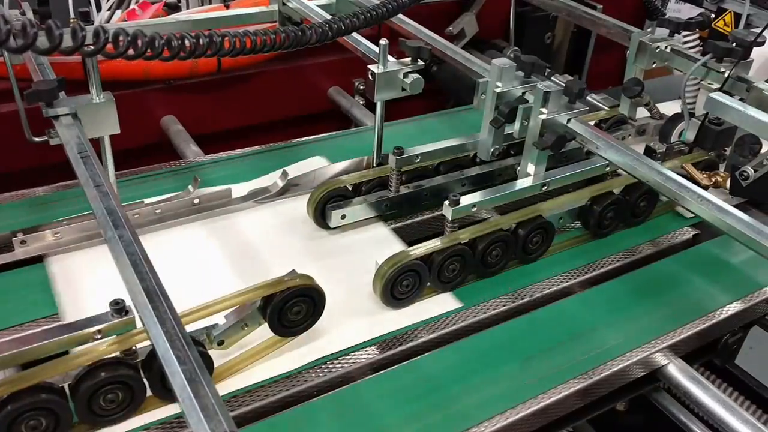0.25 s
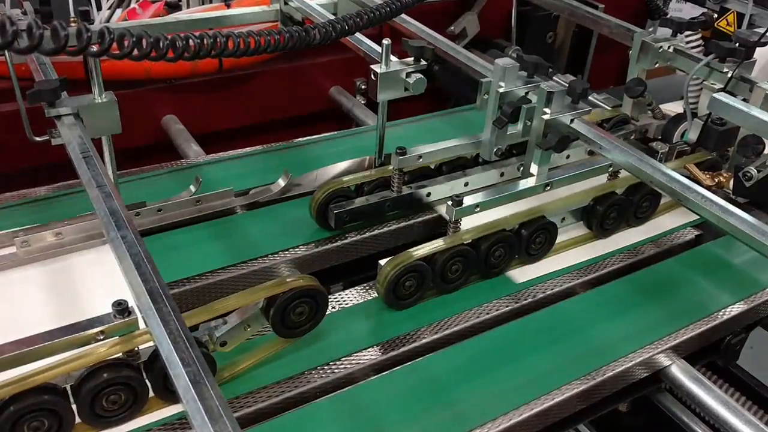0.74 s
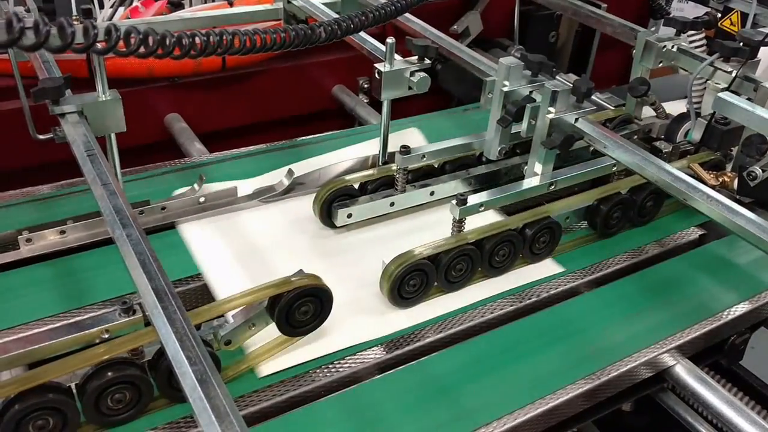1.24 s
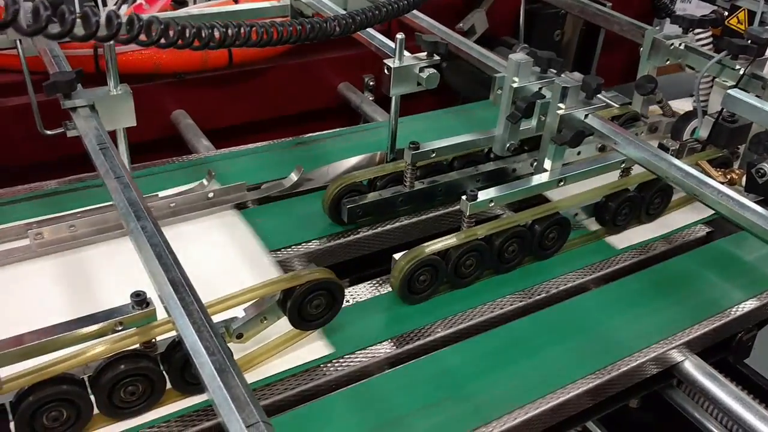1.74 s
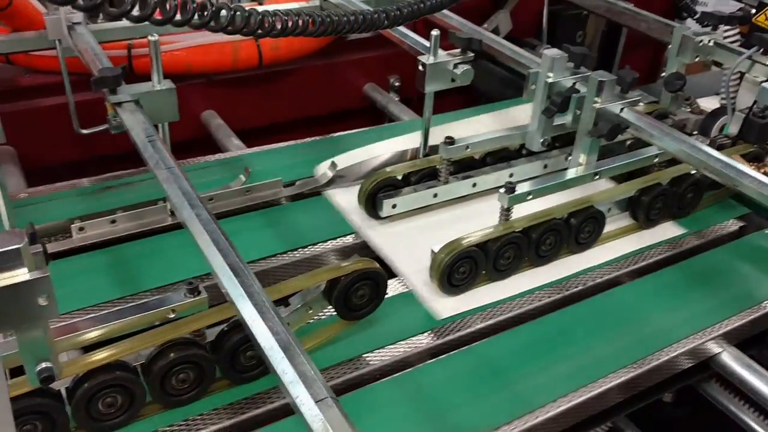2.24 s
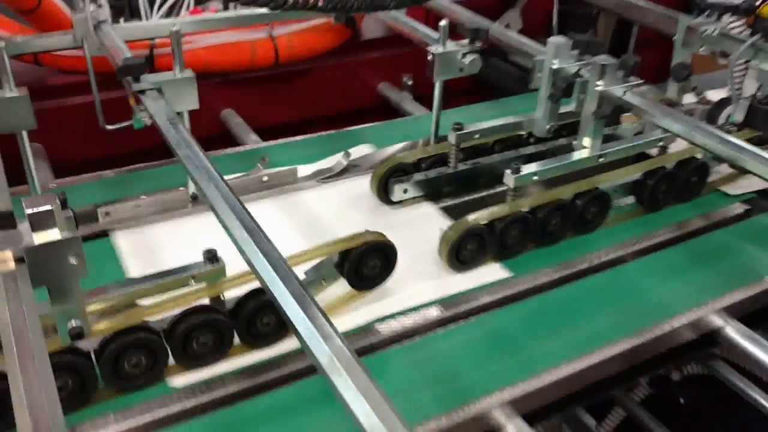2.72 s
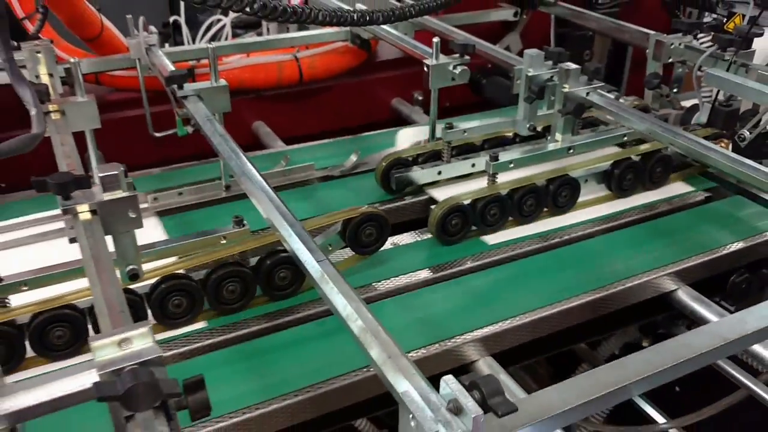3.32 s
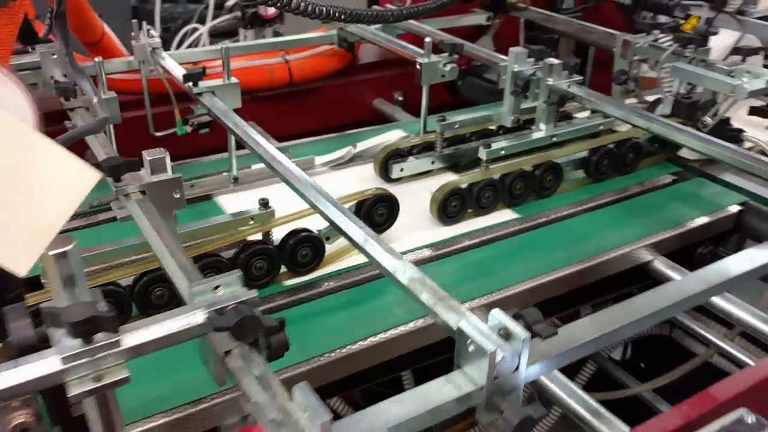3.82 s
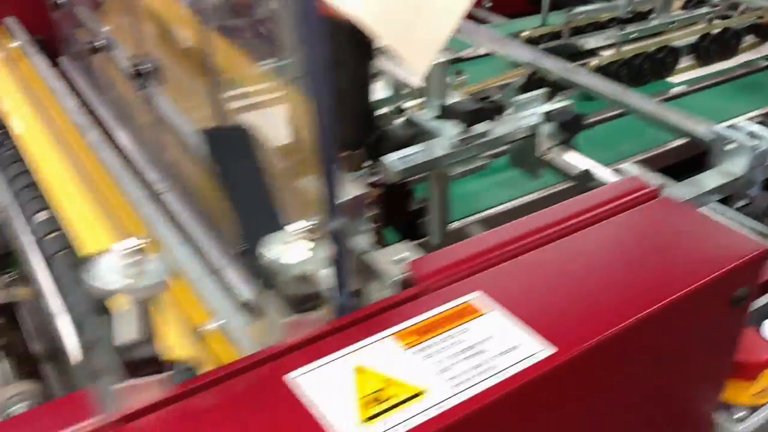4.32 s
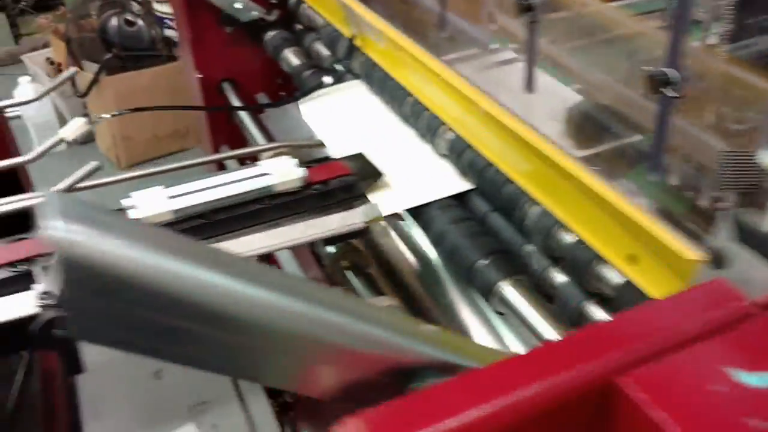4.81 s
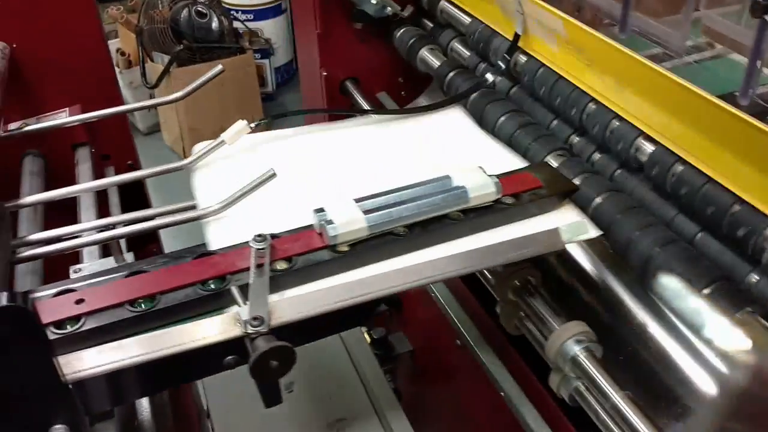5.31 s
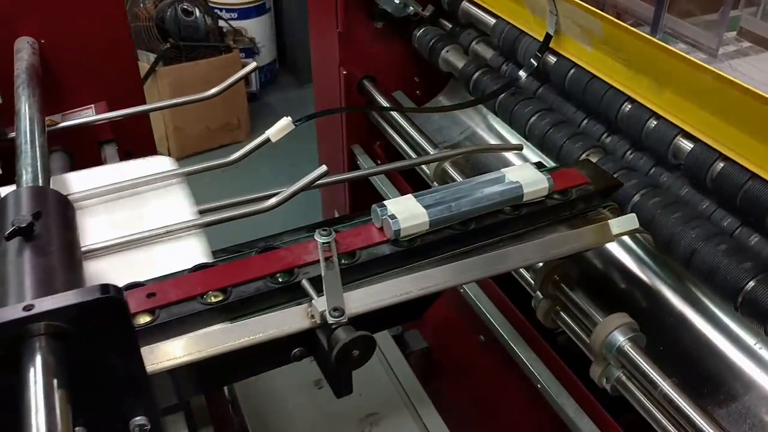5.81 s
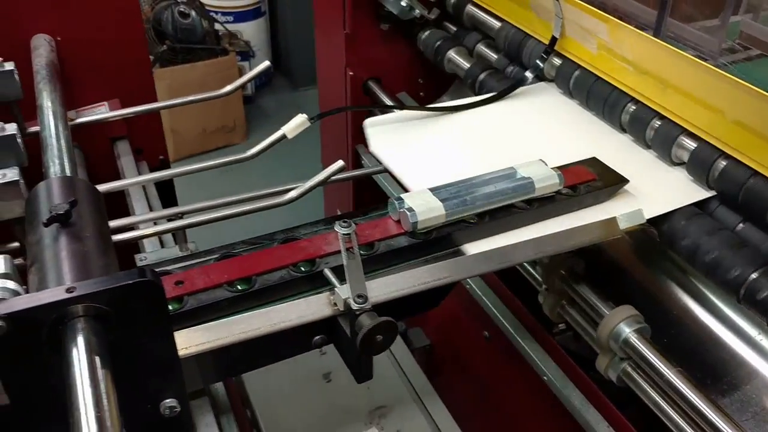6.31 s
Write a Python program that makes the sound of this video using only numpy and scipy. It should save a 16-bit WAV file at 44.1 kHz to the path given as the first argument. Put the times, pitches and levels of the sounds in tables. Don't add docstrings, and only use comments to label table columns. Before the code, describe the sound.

Close handheld stereo pickup of an envelope machine: dense airy hiss, belt whirr and faint steady tones, with sheets passing about every 1.2 seconds. A short burst of blowing air with a soft low hoot hits the microphone. Moving along the line, the hiss fades behind a machine cover, then rollers rumble and rush while a pump chatters very fast, its knocks and rattle leaning to one side.

```python
import sys
import numpy as np
from scipy import signal
from scipy.fft import irfft
from scipy.io import wavfile
from scipy.ndimage import uniform_filter1d

SR = 44100
rng = np.random.default_rng(int(sys.argv[2]) if len(sys.argv) > 2 else 0)


def put_to_file(sound):
    columns = np.atleast_2d(sound).T
    safe = np.clip(columns, -1, 1)
    whole_steps = np.round(safe * 32767)
    wavfile.write(sys.argv[1], SR, whole_steps.astype(np.int16))


def makeup_ratio(level_db):
    decades = np.asarray(level_db, float) / 20
    return 10 ** decades


N = 288851


def read(points, hz):
    f, value = np.transpose(points)
    return np.interp(np.log(hz + 1), np.log(f + 1), value)


def evened(x):
    return x / np.sqrt(np.mean(x ** 2) + 1e-20)


def curves(rows, at):
    first, *columns = np.transpose(rows)
    return np.array([np.interp(at, first, c) for c in columns])


def drift(size):
    return evened(uniform_filter1d(uniform_filter1d(rng.standard_normal(N), size), size))


# time_s, place_m along the line, turned_away 0-1, beam_grip 0-1 on the sound ahead
CAMERA_WALK = [(0, 0, .02, 0.9), (.5, 0.2, 0, .99), (.85, 0, 0, 0.84), (1.2, -0.2, 0, 0.92),
               (1.8, 0.03, 0, 0.8), (2.3, 0.03, .1, .92), (2.7, 0.14, 0.04, .99), (2.95, 0.37, .22, 0.7),
               (3.3, .7, 0.36, .8), (3.65, 1.23, 0.6, 0.9), (3.9, 1.26, .85, 0.9), (4.25, 1.68, 0.75, 0.7),
               (4.6, 2, 1, .86), (4.95, 2.5, 0.7, 0.67), (5.2, 3, 0.8, 0.8), (5.5, 3.0, 1, 0.7),
               (6.0, 3, 1, 0.8), (6.55, 3, 1, 0.75)]


def walk(t):
    return curves(CAMERA_WALK, t)


def heard_db(t, place_m, aside_m):
    return -10 * np.log10(1 + ((walk(t)[0] - place_m) / aside_m) ** 2)


SHADOW_M, SHADOW_WIDE_M = 2.09, 0.58


def shadow(t, on_m=0):
    return np.exp(-((walk(t)[0] - SHADOW_M - on_m) / SHADOW_WIDE_M) ** 2)


SHEET_S, SHEET_EVERY_S, SHEET_LONG_S = 0.15, 1.19, 0.43


def sheet(t):
    turns = ((t - SHEET_S) / SHEET_EVERY_S + .5) % 1 - .5
    return np.cos(np.pi * np.clip(turns * SHEET_EVERY_S / SHEET_LONG_S, -.5, .5)) ** 2


BLAST_S, BLAST_RISE_S, BLAST_HOLD_S = 2.52, .12, .17


def blast(t, fall_s):
    end_s = BLAST_S + BLAST_RISE_S + BLAST_HOLD_S + fall_s
    return np.clip(np.minimum((t - BLAST_S) / BLAST_RISE_S, (end_s - t) / fall_s), 0, 1)


# place_m, aside_m, near_db, hall_db, sheet_gain_db
NOISE_STATIONS = [
    (-0.31, 0.43, -20.5, -40.5, 0),
    (0.49, 0.73, -24, -30, 0),
    (3, 0.56, -27.5, -34, 1.5),
    (0.18, 0.28, -22.5, -49, 2),
]
BLAST_FALL_S, BLAST_DB, STARVE_DB, STIR_DB = .05, -14, 3, 2.5
SHADOW_DB, SHADOW_TOP_DB, SHADOW_TOP_M = 3.5, 2.5, .36


def station_levels(t):
    level = []
    for place_m, aside_m, near_db, hall_db, sheet_db in NOISE_STATIONS:
        direct = makeup_ratio(near_db + heard_db(t, place_m, aside_m))
        level.append(np.hypot(direct, makeup_ratio(hall_db)) * makeup_ratio(sheet_db * sheet(t)))
    level = np.array(level)
    gust_of_air = blast(t, BLAST_FALL_S)
    level[0] *= makeup_ratio(-STARVE_DB * gust_of_air)
    level[3] = np.hypot(level[3], makeup_ratio(BLAST_DB) * gust_of_air ** 2)
    level[2] *= makeup_ratio(STIR_DB * blast(t + 0.075, BLAST_FALL_S))
    level[[0, 1, 3]] *= makeup_ratio(-SHADOW_TOP_DB * shadow(t, SHADOW_TOP_M) ** 4)
    return level * makeup_ratio(-SHADOW_DB * shadow(t))


PUMP_HZ = 12.478
TURN_AHEAD_DB, TURN_AWAY_DB = 1.9, 4.5
# frequency_hz, density_db per Hz
SUCTION_SPECTRUM = [(300, -33), (900, -17), (1600, -17), (2400, -12), (3400, -24), (4800, -3.5),
                    (6500, 1.7), (8500, -0.5), (11500, -1), (13000, -10.5), (14700, -6.5)]
BELT_SPECTRUM = [(60, -43), (110, -9), (200, -7.5), (520, -16), (900, -9.5), (1600, -2.5), (2400, -3.5),
                 (3400, 1), (4800, -2), (6500, -4.5), (8500, -5), (11500, -4), (13000, -6), (14700, -18)]
ROLLER_SPECTRUM = [(30, -36), (60, -34), (110, -11), (200, -5), (340, -4.5), (520, -5.5), (900, -5.5),
                   (1600, -5.5), (2400, -4.5), (3400, -5.5), (4800, -9.5), (8500, -15), (11500, -17),
                   (14700, -36)]
JET_SPECTRUM = [(60, -36), (200, -23), (520, -18), (1600, -9.5), (2400, -25), (3400, -3), (4800, -22),
                (6500, -4), (8500, -1.5), (11500, -1.2), (13000, -0.5), (14700, -2.5)]
# frequency_hz, width_hz, gain_db
HOLLOW_RINGS = [(1143, 71, 4.5), (1760, 98, -0.5), (3700, 130, 1.5), (4074, 103, 4), (6270, 140, 0.5),
                (7140, 240, 1.5), (9350, 350, 1.5), (11100, 620, 0.5), (14200, 500, 4.5)]
# frequency_hz, likeness -1 to 1
PORT_LIKENESS = [(50, 0.2), (120, 0.8), (250, 0.87), (800, 0.46), (1500, 0.1), (3000, 0.071), (8000, 0.023),
                 (10500, 0.36), (13000, .45), (15000, .1)]


def air_and_belts(patchy_db=0.84, streaks_db=1.76, flutter_db=0.26, trim_db=-3, turn_gain=2.13,
                  turn_db=-4.5, throb_db=0.5, ahead=0.12):
    frames, hz = N // 256 + 5, np.fft.rfftfreq(1024, 1 / SR)
    a, b, c, d, patches, streaks = rng.standard_normal((frames, 513, 6)).T
    t = np.arange(frames) * 256 / SR
    levels = station_levels(t)
    turn = TURN_AHEAD_DB + (TURN_AWAY_DB - TURN_AHEAD_DB) * walk(t)[1]
    levels[2] *= makeup_ratio(throb_db * np.cos(2 * np.pi * (PUMP_HZ * t - .3)))
    spectra = (SUCTION_SPECTRUM, BELT_SPECTRUM, ROLLER_SPECTRUM, JET_SPECTRUM)
    power = 0
    for spectrum, level in zip(spectra, levels):
        shape = makeup_ratio(read(spectrum, hz)) ** 2
        power = power + np.outer(shape / np.sum(shape), level ** 2)

    rings_db = sum(db / (1 + (2 * (hz - f) / w) ** 2) for f, w, db in HOLLOW_RINGS)
    patches = evened(uniform_filter1d(uniform_filter1d(patches, size=12, axis=0), size=16, axis=1))
    streaks = evened(uniform_filter1d(uniform_filter1d(streaks, size=2, axis=0), size=60, axis=1))
    flutter = evened(uniform_filter1d(rng.standard_normal(frames), size=8))
    flutter = flutter * np.clip(hz / 9000, 0, 1)[:, None]
    field_db = rings_db[:, None] + patchy_db * patches + streaks_db * streaks + flutter_db * flutter

    near = np.outer(np.clip((hz - 8500) / 1500, 0, 1), np.clip(1 - turn / 4, 0, 1))
    same = np.clip(read(PORT_LIKENESS, hz)[:, None] + ahead * near, -1, .95)
    first = a + 1j * b
    ports = np.array([first, same * first + np.sqrt(1 - same ** 2) * (c + 1j * d)])
    shade_db = (turn_gain * turn + turn_db) * np.clip(hz / 6000, 0, 1)[:, None]
    ports *= np.sqrt(power) * makeup_ratio(field_db + trim_db) * makeup_ratio([shade_db / 2, -shade_db / 2])
    return signal.istft(ports, nperseg=1024, noverlap=768)[1][:, :N]


DRIVE_TONES = [339.6, 761.1, 849, 1018.4]
# place_m, aside_m, near_db, sheet_loss_db
DRIVE_PLACES = [(-.1, .55, -44.5, 6), (0, .5, -58, 6), (.55, .8, -48.5, 3.5), (.95, .33, -46.5, 8)]
GUARD_M, GUARD_EDGE_M, GUARD_DB = 2.05, 0.18, 10


def drive(waver_db=2.0, waver_turns=0.031):
    t = np.arange(N) / SR
    screened_db = GUARD_DB / (1 + np.exp((GUARD_M - walk(t)[0]) / GUARD_EDGE_M))
    out = np.zeros((2, N))
    for hz, (place_m, aside_m, db, sheet_db) in zip(DRIVE_TONES, DRIVE_PLACES):
        start = rng.random()
        near_db = db + heard_db(t, place_m, aside_m) - sheet_db * sheet(t) - screened_db
        for port in out:
            turns = hz * t + start + waver_turns * drift(size=5000)
            level_db = near_db + waver_db * drift(size=5000)
            port += np.sqrt(2) * makeup_ratio(level_db) * np.sin(2 * np.pi * turns)
    return out


def dying(turns, fade_db):
    u = turns % 1
    return makeup_ratio(fade_db * (0.2776 - u + np.maximum(u - .95, 0) * 20))


# shaft_order, level_db
CASING_ORDERS = [(11, -53.8), (12, -54.0), (15, -51.2), (19, -49.1), (20, -56.7), (21, -55.6), (23, -45.7),
                 (24, -57.7), (25, -52.7), (26, -49.5), (27, -48.6), (28, -48.2), (29, -55.9), (30, -55.9),
                 (32, -57.5), (36, -57.3), (38, -53.2), (47, -56.5), (50, -57.3), (54, -59.8), (55, -58.5),
                 (57, -55.3), (58, -51.7), (59, -58.8), (60, -54.4), (62, -59.5), (64, -54.3), (67, -60.5),
                 (76, -58.3), (94, -60.9)]
PUMP_M, PUMP_ASIDE_M, PUMP_DB, PUMP_HALL_DB, PUMP_SIDE_DB = 3.32, 0.37, 2, -11, 5
RATTLE_PER_DB = .35
KNOCK_FADE_DB, RATTLE_FADE_DB = 8, 3


def pump(knock_at=0.0904, floor_db=-67, waver_db=0.6):
    t, k = np.arange(N) / SR, np.arange(129)
    order, db = np.transpose(CASING_ORDERS)
    gain_db = np.full(129, floor_db * 1.)
    gain_db[np.round(order).astype(int)] = db
    phase = -signal.hilbert(np.log(makeup_ratio(np.r_[gain_db, gain_db[-2:0:-1]]))).imag[:129]
    phase += 3 * (k / 50) ** 3 * (gain_db <= floor_db) * rng.standard_normal(129)
    phase -= (k >= 44) * k * np.pi / 2

    direct = makeup_ratio(PUMP_DB + heard_db(t, PUMP_M, PUMP_ASIDE_M))
    near_db = 20 * np.log10(np.hypot(direct, makeup_ratio(PUMP_HALL_DB)))
    side_db = .5 + PUMP_SIDE_DB * walk(t)[1]
    at = (PUMP_HZ * t - knock_at) % 1

    def one_turn(orders):
        wave = irfft(makeup_ratio(gain_db) * orders * np.exp(1j * phase), 4096)
        return np.interp(at, np.arange(4096) / 4096, wave)

    thud = one_turn((k > 9) & (k < 44)) * dying(at + 0.052, KNOCK_FADE_DB)
    rattle = one_turn((k >= 44) & (k < 100)) * dying(at - .2, RATTLE_FADE_DB)
    knocks = thud * makeup_ratio([np.zeros(N), -side_db]) + rattle * makeup_ratio(RATTLE_PER_DB * near_db)
    return knocks * makeup_ratio(near_db + waver_db * drift(size=3000)) * 4096 / np.sqrt(2)


GUST_S, GUST_LONG_S, GUST_FROM_HZ, GUST_TO_HZ, GUST_DB, GUST_ENDS_DB = 2.5, .3, 95, 360, -47, -24


def gust(width_hz=40):
    u = (np.arange(N) / SR - GUST_S) / GUST_LONG_S
    hz = GUST_FROM_HZ * (GUST_TO_HZ / GUST_FROM_HZ) ** np.clip(u, 0, 1)
    level_db = GUST_DB + GUST_ENDS_DB * np.clip(2 * u - 1, -2, 2) ** 2
    carrier = np.exp(2j * np.pi * np.cumsum(hz) / SR)
    r = np.exp(-np.pi * width_hz / SR)
    slow = signal.lfilter([1], [1, -2 * r, r * r], rng.standard_normal((N, 2)) @ [1, 1j])
    return evened((slow * carrier).real) * makeup_ratio(level_db)


def scene():
    return air_and_belts() + drive() + pump() + gust()


CROSS_DELAY_SAMPLES = 17
AIM_M, AIM_BACK = .6, .45
# frequency_hz, share, lead_belts_rad, lead_rollers_rad
CROSS_SHARE = [(100, 0.57, 0.11, 0.27), (1300, 0.76, -0.016, -0.11), (2830, 1, 0.049, -0.34),
               (3660, 0.54, -0.38, -0.11), (5300, 0.8, 0.13, 0.048), (6460, 0.53, -0.4, 0.013),
               (7750, 0.53, -0.15, 0.086), (9000, 0.29, 0.029, 0.29), (10600, 0.24, -0.13, .1),
               (11700, 0.53, 0.17, .45), (13100, .45, -.1, 0.39), (14000, 0.27, -.6, -.3),
               (15000, .15, -.6, -.3)]


def beams(ports, hz, t, wander=0.12, unrest=0.96):
    share, lead_belts, lead_rollers = curves(CROSS_SHARE, hz)[:, :, None]
    place_m, _, grip = walk(t)
    facing = np.clip(1 - np.exp(-place_m / AIM_M) - AIM_BACK * shadow(t), 0, 1)
    share = np.clip(share * grip, 0, .99)
    hunt = rng.standard_normal((len(t), len(hz))).T
    hunt = evened(uniform_filter1d(uniform_filter1d(hunt, size=30, axis=0), size=14, axis=1))
    lead = (1 - facing) * lead_belts + facing * lead_rollers
    lead = lead + wander * (1 + unrest * facing) * (hz[:, None] / 2600) ** 0.55 * hunt
    cross = share * np.exp(1j * (lead - 2 * np.pi * hz[:, None] * CROSS_DELAY_SAMPLES / SR))
    likeness = np.clip(read(PORT_LIKENESS, hz), -1, 1)[:, None]
    loss = np.sqrt(1 + share ** 2 - 2 * likeness * cross.real)
    return (ports - cross * ports[::-1]) / loss


EDGE_HZ = 15100
# frequency_hz, gain_db
MIC_TOP = [(14400, .1), (14900, -3), (15100, -6), (15800, -7)]
# start_s, long_s, edge_hz
BAND_EDGE_STEPS = [
    (2.51, .07, 15780),
    (2.58, .05, 15480),
    (2.63, .045, 15780),
    (4.32, .13, 14450),
    (4.49, .04, 14450),
    (4.67, .07, 14450),
    (4.83, .22, 14450),
    (5.09, .17, 14450),
]


def top_end(hz, t):
    edge_hz = EDGE_HZ + sum((f - EDGE_HZ) * (t >= s) * (t < s + d) for s, d, f in BAND_EDGE_STEPS)
    return makeup_ratio(read(MIC_TOP, hz))[:, None] * (hz[:, None] < edge_hz)


def low_pass(x):
    return signal.sosfilt(signal.butter(12, 15810, fs=SR, output="sos"), x)


DUCK_DB, DUCK_RECOVER_S = 2, 0.21


def record(dry):
    hz, t, ports = signal.stft(dry, SR, nperseg=1024, noverlap=768)
    pair = beams(ports, hz, t) * top_end(hz, t) * makeup_ratio(-DUCK_DB * blast(t, DUCK_RECOVER_S))
    mix = signal.istft(pair, SR, nperseg=1024, noverlap=768)[1][:, :N]
    return low_pass(mix)


dry = scene()
out = record(dry)
put_to_file(out)
```